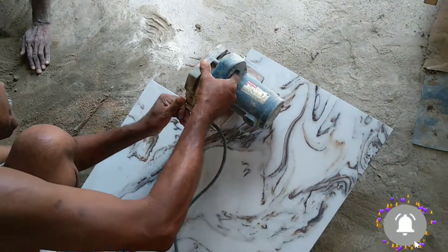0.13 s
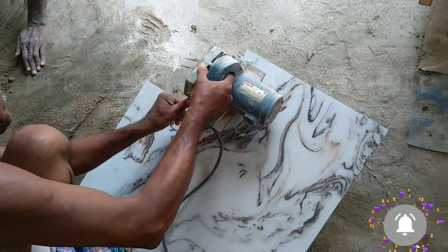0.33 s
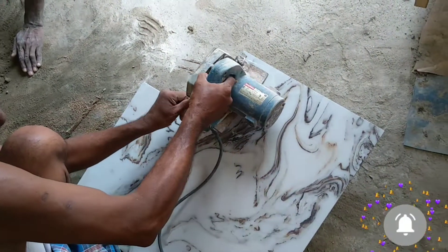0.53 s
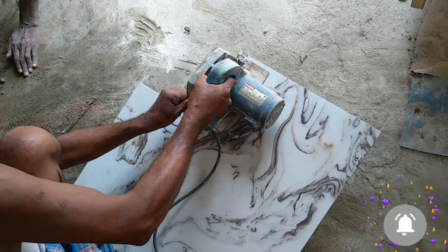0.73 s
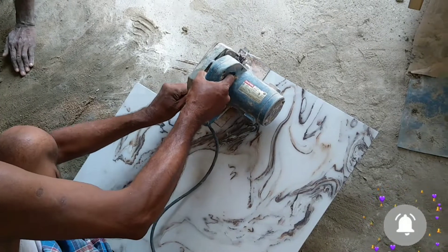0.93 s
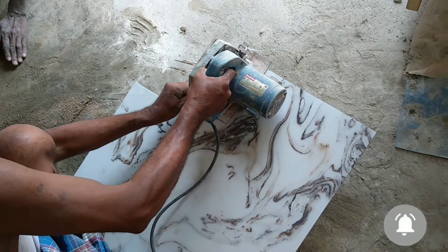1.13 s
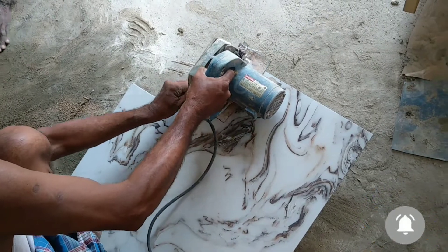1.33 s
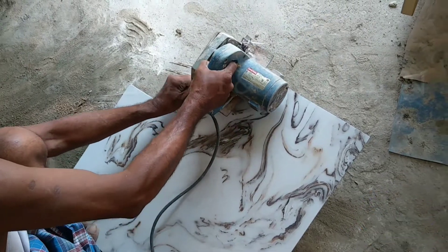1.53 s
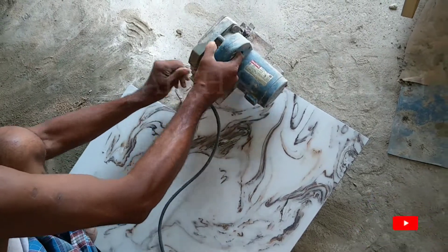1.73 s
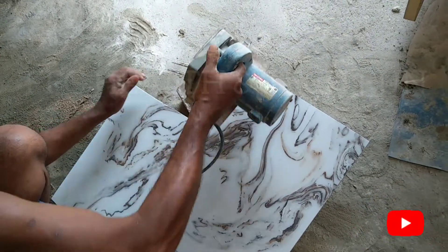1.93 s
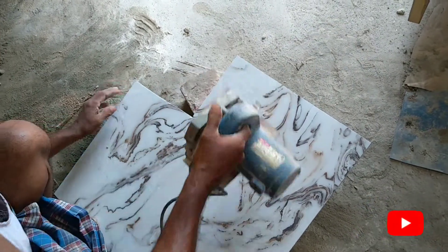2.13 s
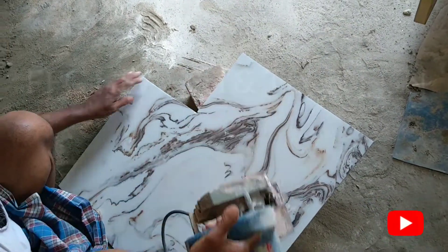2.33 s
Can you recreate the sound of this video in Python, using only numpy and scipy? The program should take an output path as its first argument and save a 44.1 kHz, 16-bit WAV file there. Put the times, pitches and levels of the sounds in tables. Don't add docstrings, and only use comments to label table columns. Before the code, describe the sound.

Close up in a quiet yard, a power cutter whirs and knocks, its steel blade grinds and rings harshly in a tile, rubs its way out, and the motor continues with a thinner, quieter whir.

```python
import sys
import numpy as np
from scipy import signal
from scipy.fft import rfft, irfft
from scipy.io import wavfile
from scipy.ndimage import uniform_filter1d

SR = 44100
rng = np.random.default_rng(int(sys.argv[2]) if len(sys.argv) > 2 else 0)


def voltage_ratio(level):
    return 10 ** (np.asarray(level, float) / 20)


def put_to_file(sound):
    columns = np.atleast_2d(sound).T
    safe = np.clip(columns, -1, 1)
    whole_steps = np.round(safe * 32767)
    wavfile.write(sys.argv[1], SR, whole_steps.astype(np.int16))


N = 105840


def evened(x):
    return x / np.sqrt(np.mean(x ** 2) + 1e-20)


def read(points, hz):
    f, *values = np.transpose(points)
    return [np.interp(np.log(hz + 1), np.log(f + 1), v) for v in values]


def follow(rows):
    s, *values = np.transpose(rows)
    return [np.interp(np.arange(N) / SR, s, v) for v in values]


def colour(x, spectrum):
    gain = voltage_ratio(read(spectrum, np.fft.rfftfreq(N, 1 / SR))[0])
    return evened(irfft(rfft(x) * gain, N))


def resonate(x, hz, width, steady=0):
    turn = np.exp(2j * np.pi * np.cumsum(hz * np.ones(N)) / SR)
    r = np.exp(-np.pi * width / SR)
    z = signal.lfilter([1 - r], [1, -r], x / turn)
    level = (evened(abs(z)) + .1) ** steady if steady else 1
    return evened((turn * z / level).real)


def bursts(per_s, spread_db, fade_s, depth=1):
    pace = rng.exponential(1, N // 200 + 1).repeat(200)[:N]
    count = np.cumsum(per_s / SR * pace)
    strike = np.diff(count // 1, prepend=0)
    size = voltage_ratio(spread_db * np.minimum(rng.exponential(1, N), 2)) * strike
    shape = 1 + depth * signal.lfilter([1], [1, -np.exp(-1 / (fade_s * SR))], size)
    return evened(shape * rng.standard_normal((2, N)))


def waver(swing_db):
    size = round(.06 * SR / 64)
    slow = rng.standard_normal(N // 64 + 1)
    slow = evened(uniform_filter1d(uniform_filter1d(slow, size), size))
    return voltage_ratio(swing_db * np.interp(np.arange(N) / 64, np.arange(len(slow)), slow))


# (time [s], half length [s], frequency [Hz], level [dB])
FLARES = [(0.265, 0.039, 690, 8), (0.61, 0.027, 690, 1.5), (.33, 0.057, 1500, 2), (0.66, 0.049, 6215, 10.5),
          (0.727, 0.009, 6215, 16.5), (0.687, 0.026, 4815, -5), (0.68, 0.029, 5530, 7),
          (0.776, .04, 4815, 2.5), (0.787, 0.038, 7080, 3), (0.918, 0.02, 7080, 11.5), (0.97, .04, 3720, 4),
          (1.03, 0.025, 7080, 8), (1.449, 0.065, 4270, 11.5), (1.55, 0.037, 6215, 7),
          (1.643, 0.063, 7080, 19), (1.637, 0.022, 4815, 6.5), (1.692, 0.022, 4815, -5),
          (1.956, 0.042, 2350, 14), (2.022, .025, 3800, 8.5), (2.065, 0.013, 3800, -4),
          (2.113, 0.044, 3990, 11), (2.278, 0.029, 2350, 16), (2.317, 0.021, 690, 15),
          (2.37, 0.032, 2350, 16)]


def flare(hz):
    t = np.arange(0, N, 64) / SR
    db = 0
    for s, half, f, peak_db in FLARES:
        nearness = (np.log(f / hz) / .04) ** 2
        db = db + peak_db * np.exp(-((t - s) / half) ** 2 - nearness)
    return voltage_ratio(db).repeat(64)[:N]


# (frequency [Hz], left over right [dB], likeness [0-1])
PORT_FREE = [(60, -2, 0.84), (500, 0, 0.89), (1440, 1.5, 0.45), (2440, 5, 0.22), (4530, 15, 0.67),
             (6400, 12.5, 0.13), (8950, -4.5, 0.98), (14800, -1, 0.45)]
# (frequency [Hz], left over right [dB], likeness [0-1])
PORT_CUT = [(596, 21, 0.68), (1410, -2, 0.89), (2420, 2, 0.19), (4600, 7, 0.69), (6330, 9, 0.1),
            (8100, -9, 0.5), (14900, 2, 0.11)]


def ports(pair, table):
    hz = np.fft.rfftfreq(N, 1 / SR)
    over_db, same = read(table, hz)
    lead = 2 * np.pi * hz * 5e-5 * (hz < 7300)
    a, b = rfft(pair)
    right = same * a * np.exp(1j * lead) + np.sqrt(1 - same ** 2) * b
    lift = 2 / np.sqrt(1 + voltage_ratio(-2 * over_db) + 2 * voltage_ratio(-over_db) * same * np.cos(lead))
    return irfft(lift * np.array([a, right * voltage_ratio(-over_db)]), N)


# (time [s], level [dB], coasting share [0-1])
MOTOR = [(.244, -75, 0.3), (.249, -19, 0.5), (.258, -18, 0.06), (.55, -23.5, 0.39), (.62, -23.5, 0.1),
         (.65, -24, 0.7), (.7, -25, 0), (.8, -20, 0.98), (1.6, -27, 0.5), (1.7, -19.5, 0.63),
         (1.795, -19.5, 0.67), (1.82, -28.5, 0.83), (2.03, -28, 0.64), (2.4, -30.5, 0.53)]
# (frequency [Hz], level per Hz [dB])
DRIVEN = [(88, -76), (150, -77), (624, -12), (1900, -13.5), (4000, -11.5), (5050, -14), (11500, -28.5),
          (16000, -46)]
# (frequency [Hz], level per Hz [dB])
COASTING = [(88, -67), (150, -27.5), (689, -5), (1700, -7.5), (3920, 7.5), (7320, -9.5), (11000, -14.5),
            (16000, -20)]


def motor():
    level_db, coast = follow(MOTOR)
    knock = gear_knocks(level_db)
    drive = knock * rng.standard_normal((2, N))
    rattle = bursts(95, 1., .0022, 0.4)
    hiss = evened(0.5 * evened(drive) + rattle)
    body = (1 - coast) * colour(hiss, DRIVEN) + coast * colour(hiss, COASTING)
    tool = 0.76 * body + housing_rings(drive, coast) + gear_whine(knock)
    no_rumble = signal.butter(3, 140, 'high', fs=SR, output='sos')
    return ports(voltage_ratio(level_db) * signal.sosfilt(no_rumble, tool), PORT_FREE)


# (time [s], peak level [dB])
KNOCKS = [(0.2489, -10), (0.2609, -12), (0.274, -12), (0.2896, -16), (0.2987, -7), (0.3087, -8),
          (0.315, -16), (0.3233, -9), (0.3276, -10), (0.3495, -8.5), (0.3604, -13), (0.3676, -14.5),
          (0.384, -14), (0.397, -9), (0.4067, -14.5), (0.4118, -9), (0.422, -11), (0.4298, -9.5),
          (0.4474, -10), (0.4594, -15), (0.4704, -10), (0.4878, -10.5), (0.5057, -7), (0.5196, -14.5),
          (0.5316, -9), (0.5402, -22), (0.5466, -11), (0.5685, -10), (0.5766, -17.5), (0.589, -11.5),
          (0.607, -14), (0.627, -7), (1.8755, -19), (1.899, -22), (1.9435, -19), (1.9706, -20),
          (2.0092, -20), (2.0257, -20.5), (2.0912, -19), (2.1256, -20.5), (2.147, -17), (2.2094, -18.5),
          (2.2501, -19), (2.276, -21), (2.3074, -21), (2.3294, -23), (2.351, -22.5)]


def gear_knocks(level_db):
    fade_s = 0.0027
    s, db = np.transpose(KNOCKS)
    at = (s * SR).astype(int)
    size = np.zeros(N)
    size[at] = voltage_ratio(2 * (db - level_db[at] - 23.5))
    size = uniform_filter1d(size, size=40) * 40
    return 1 + signal.lfilter([1], [1, -np.exp(-1 / (fade_s * SR))], size)


# (frequency [Hz], width [Hz])
HOUSING = [(312, 14), (690, 130), (1500, 60), (2350, 160), (3430, 150), (3800, 250), (4760, 70),
           (5900, 500)]
# (under power [dB], coasting [dB])
HOUSING_DB = [(-28.5, -40.5), (-15.5, -35), (-18, -40), (-29.5, -17), (-8.5, -25), (-9, -11), (-18, -38),
              (-20, -7.5)]


def housing_rings(drive, coast):
    rings = 0
    for (hz, width), (driven_db, coasting_db) in zip(HOUSING, HOUSING_DB):
        gain = voltage_ratio(driven_db + (coasting_db - driven_db) * coast) * waver(1.056) * flare(hz)
        rings = rings + gain * resonate(resonate(drive, hz, 2 * width), hz, 2 * width)
    return rings


# (time [s], frequency [Hz])
WHINE_HZ = [(.25, 4060), (.29, 3940), (.47, 3960), (.63, 4100), (1.8, 3950), (2.03, 3850), (2.13, 4080),
            (2.2, 3880), (2.4, 3780)]
# (time [s], level [dB])
WHINE_DB = [(.25, -8), (.4, -5.5), (.56, 2), (.62, -1), (.66, -20), (1.8, -13.5), (2.4, -11.5)]


def gear_whine(knock):
    breath = resonate(rng.standard_normal((2, N)), 3700, 1300)
    tone = resonate(breath, follow(WHINE_HZ)[0], 180, 0.44)
    flutter = evened(uniform_filter1d(knock, size=130))
    return voltage_ratio(follow(WHINE_DB)[0]) * flare(3890) * flutter * tone


# (time [s], ring level [dB], grit level [dB])
CUT = [(.6, -80, -86), (.624, -26, -19), (.63, -21, -22), (.645, -20.5, -21), (.67, -16.5, -32),
       (.7, -23, -31), (.708, -15, -14), (.732, -26, -21), (.745, -17, -23), (1, -16.5, -17.5),
       (1.4, -17.5, -15.5), (1.61, -17, -17.5), (1.68, -19.5, -29.5), (1.76, -26, -44), (1.84, -59, -56),
       (1.88, -62, -77)]
# (frequency [Hz], level per Hz [dB])
GRIT = [(300, -12.5), (600, -12), (1500, -16), (2700, -7.5), (4200, -1.5), (6500, -6.5), (9000, -9),
        (15500, -14)]


def cut():
    ring_db, grit_db = follow(CUT)
    depth = follow([(.63, 0), (1.35, 1)])[0]
    chips = chip_bursts()
    ring = voltage_ratio(ring_db) * blade_ring(chips, depth)
    grit = voltage_ratio(grit_db) * (colour(chips, GRIT) + slab_ring(depth))
    return ports(ring + grit, PORT_CUT) + ports(blade_rub(), PORT_FREE)


def chip_bursts():
    return bursts(150, 2, 0.00067)


# (at the edge [Hz], deep [Hz], width [Hz])
BLADE = [(3240, 3250, 40), (3720, 3750, 170), (4270, 4310, 35), (4815, 4935, 70), (5530, 5410, 55),
         (6215, 6330, 60), (7080, 7020, 25), (8350, 8420, 200), (9000, 9050, 40), (5940, 5950, 35),
         (10450, 10520, 300), (11480, 11500, 35)]
# (at the edge [dB], deep [dB])
BLADE_DB = [(-12, -10), (-0.5, -1), (-5.5, -6), (3.5, 2.5), (-3, -7.5), (-3.5, -0.5), (-0.5, -10.5),
            (-10, -14.5), (-17, -10), (-19, -16), (-25, -8), (-15, -17)]


def blade_ring(chips, depth):
    ring = 0
    for (edge_hz, deep_hz, width), (edge_db, deep_db) in zip(BLADE, BLADE_DB):
        hz = edge_hz + (deep_hz - edge_hz) * depth
        gain = voltage_ratio(edge_db + (deep_db - edge_db) * np.sqrt(depth)) * waver(0.944) * flare(edge_hz)
        ring = ring + gain * resonate(resonate(chips, hz, 8 * width), hz, width, .45)
    return evened(ring)


# (frequency [Hz], width [Hz], level at the edge [dB], level deep [dB])
TILE = (1230, 140, -7, -18)


def slab_ring(depth):
    hz, width, edge_db, deep_db = TILE
    return voltage_ratio(edge_db + (deep_db - edge_db) * depth) * resonate(bursts(60, 7.5, 0.011), hz, width)


# (time [s], level [dB])
RUB = [
    (1.58, -90),
    (1.68, -28),
    (1.8, -24),
    (1.845, -27),
    (1.96, -90),
]
# (frequency [Hz], level per Hz [dB])
RUB_BAND = [(2000, -73), (5000, 8), (6500, 8), (16000, -24)]


def blade_rub():
    return voltage_ratio(follow(RUB)[0]) * colour(chip_bursts(), RUB_BAND)


# (time [s], left level [dB], right level [dB])
BUFFET = [(.62, -76, -77), (.7, -32, -57), (.75, -29.5, -67), (.94, -16, -43), (1.05, -15, -37.5),
          (1.13, -15.5, -16.5), (1.18, -14.5, -31), (1.26, -13, -20), (1.48, -15.5, -30.5),
          (1.62, -19, -34), (1.65, -28.5, -50), (1.7, -62, -61)]
# (frequency [Hz], level per Hz [dB])
PUFF = [(20, -37), (50, -3), (150, -1.5), (400, -3.5), (900, -6), (2000, -7), (16000, -26.5)]


def buffet():
    puffs = [colour(bursts(38, 5.5, 0.0029)[0], PUFF) for port in range(2)]
    return voltage_ratio(follow(BUFFET)) * puffs + thumps()


# (time [s], level [dB])
THUMPS = [(0.633, -26.5), (0.712, -19), (0.747, -20), (0.783, -13), (0.813, -45), (0.841, -7),
          (0.89, -10.5)]


def thumps():
    s, db = np.transpose(THUMPS)
    u = (np.arange(N)[:, None] / SR - s) / .0012
    near = np.clip(u, -6, 6)
    push = (near ** 2 / 2 - 1) * np.exp(-near ** 2 / 2)
    return [[1], [.03]] * (voltage_ratio(db) * push).sum(1)


# (time [s], level [dB])
LURCH = [
    (.187, -79),
    (.194, -30),
    (.214, -27),
    (.236, -30.5),
    (.246, -29.5),
    (.25, -80),
]
# (frequency [Hz], level per Hz [dB])
LURCH_BODY = [(88, -64), (150, -20), (1530, -31), (2550, -26), (5250, -5), (16000, -62)]
# (frequency [Hz], width [Hz], level [dB])
LURCH_RINGS = [(1080, 120, -5), (1520, 120, -2), (2300, 150, -6)]


def lurch():
    drive = bursts(200, 2., .002)
    speed = follow([(.19, .94), (.24, 1.04)])[0]
    rings = sum(voltage_ratio(db) * resonate(drive, hz * speed, width) for hz, width, db in LURCH_RINGS)
    scrape = evened(colour(drive, LURCH_BODY) + rings)
    return ports(voltage_ratio(follow(LURCH)[0]) * scrape, PORT_FREE)


# (frequency [Hz], level per Hz [dB])
YARD = [(88, -35), (150, -14.5), (716, -12), (821, -17.5), (5910, -10), (13700, -29), (16000, -43)]
# (frequency [Hz], level [dB])
HUMS = [
    (84, -55),
    (712, -57),
]
# (frequency [Hz], level per Hz [dB])
RUMBLE = [(30, -23), (100, -2), (220, -30), (16000, -90)]


def yard():
    t = np.arange(N) / SR
    hums = sum(voltage_ratio(db) * np.sin(2 * np.pi * hz * t) for hz, db in HUMS)
    rumble = voltage_ratio(-66) * colour(rng.standard_normal(N), RUMBLE)
    wash = voltage_ratio(-47.5) * colour(rng.standard_normal((2, N)), YARD)
    return ports(wash, PORT_FREE) + hums + rumble


def scene():
    recover_db_per_s, duck_from_db = 31, -31
    tool = motor() + cut() + buffet() + lurch()
    power_db = 10 * np.log10(abs(uniform_filter1d((tool ** 2).mean(0), 800)) + 1e-12)
    fall = np.arange(N) * recover_db_per_s / SR
    held_db = np.maximum.accumulate(power_db + fall) - fall
    return tool + yard() / voltage_ratio(np.maximum(held_db - duck_from_db, 0))


# (frequency [Hz], share of the ports' sum lost [0-1], of their difference [0-1])
HOLES = [(6700, 0, 0), (7600, .45, .55), (8700, .1, .3), (11500, .15, .35), (13500, .45, .5),
         (15800, .7, .8)]


def drop_bands(x):
    hz, t, z = signal.stft([x[0] + x[1], x[0] - x[1]], SR, nperseg=1024, noverlap=512)
    luck = rng.random((2, len(hz) // 10 + 1, len(t) // 3 + 1))
    luck = luck.repeat(10, 1).repeat(3, 2)[:, :len(hz), :len(t)]
    kept = z * (luck > np.array(read(HOLES, hz))[..., None])
    mid, side = signal.istft(kept, SR, nperseg=1024, noverlap=512)[1][:, :N]
    return np.array([mid + side, mid - side]) / 2


def top_cut(x):
    return signal.sosfilt(signal.butter(12, 16590, fs=SR, output="sos"), x)


# (frequency [Hz], level [dB])
MICROPHONE = [(25, -14), (55, 0), (6500, 0), (7600, -12), (8400, -4), (15900, 0), (16050, -90)]


def record(dry):
    ceiling = .82
    squeezed = ceiling * np.tanh(dry / ceiling)
    gain = voltage_ratio(read(MICROPHONE, np.fft.rfftfreq(N, 1 / SR))[0])
    heard = drop_bands(irfft(rfft(squeezed) * gain, N))
    return top_cut(heard)


dry = scene()
out = record(dry)
put_to_file(out)
```